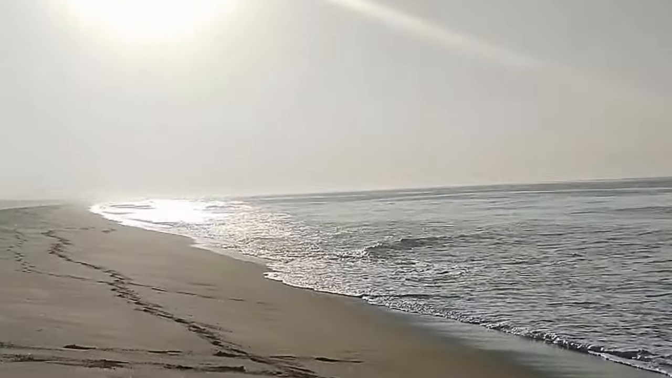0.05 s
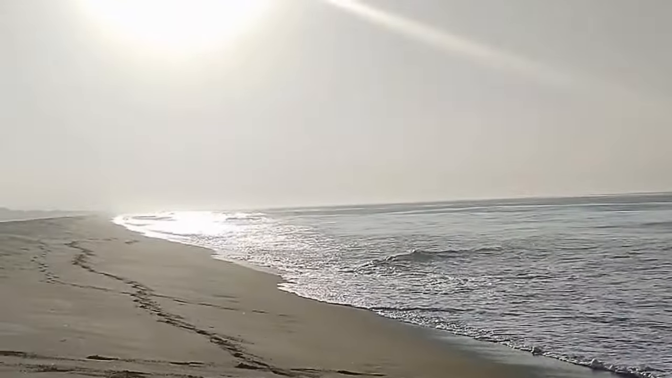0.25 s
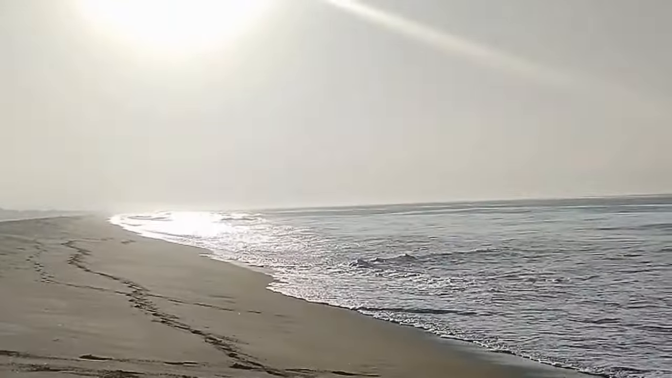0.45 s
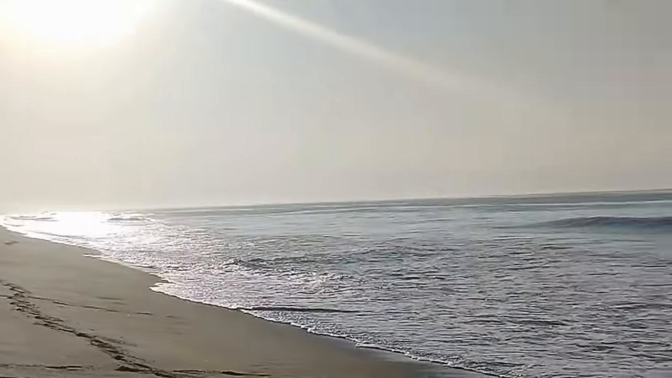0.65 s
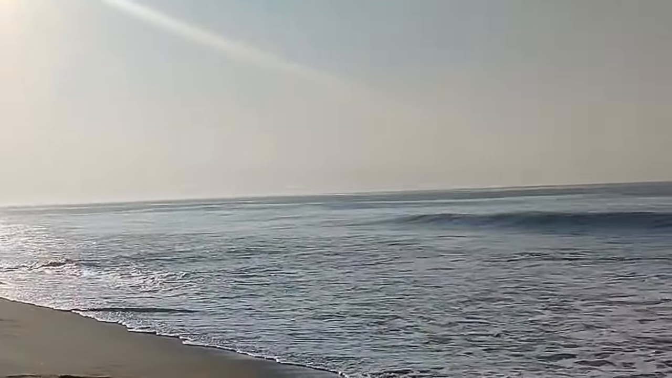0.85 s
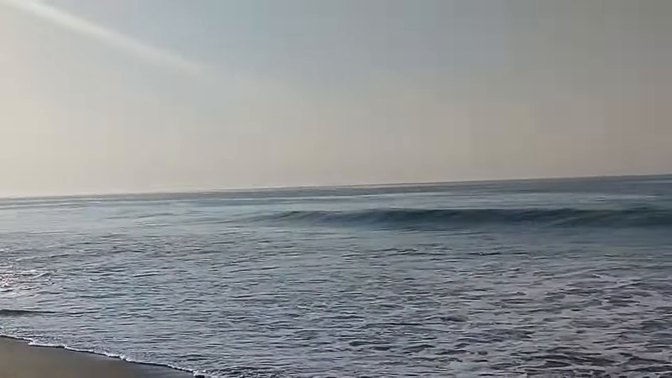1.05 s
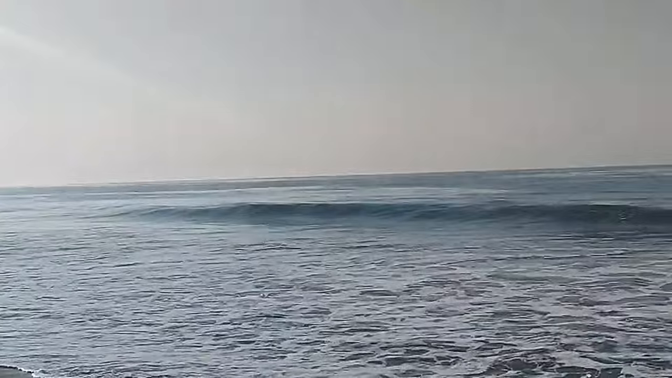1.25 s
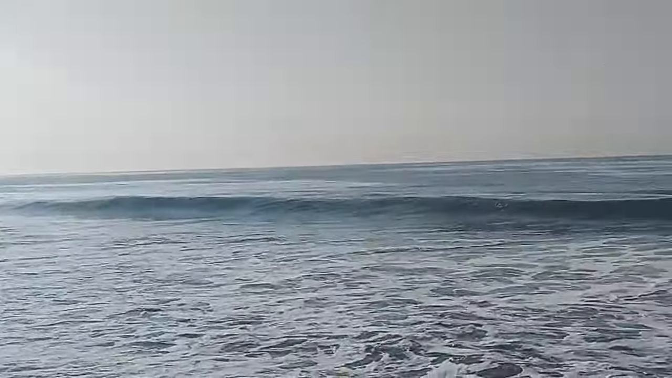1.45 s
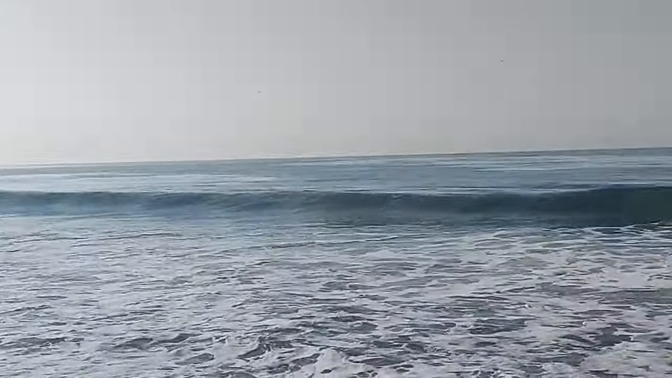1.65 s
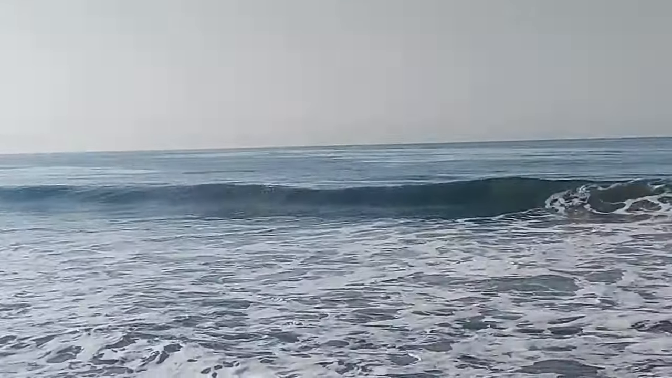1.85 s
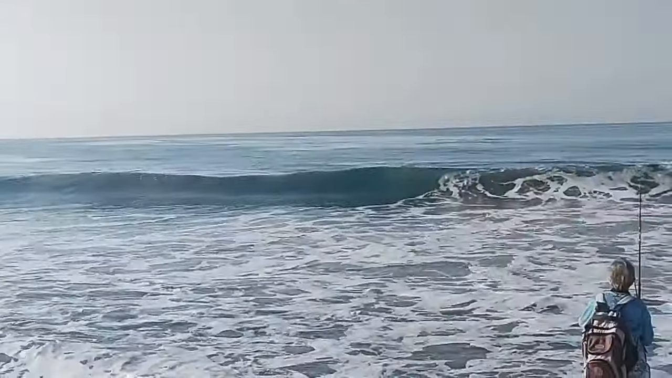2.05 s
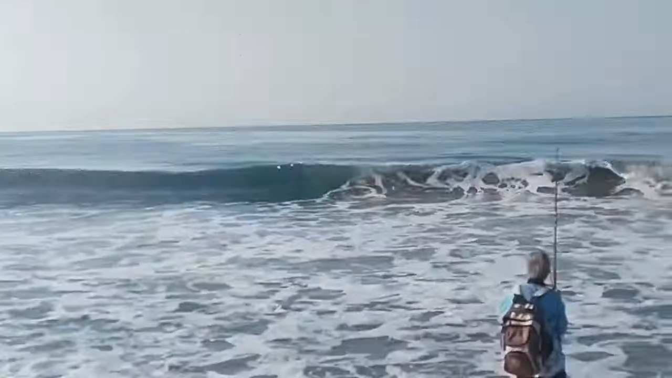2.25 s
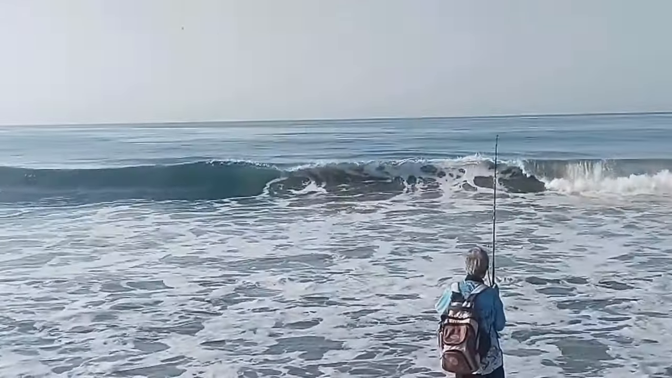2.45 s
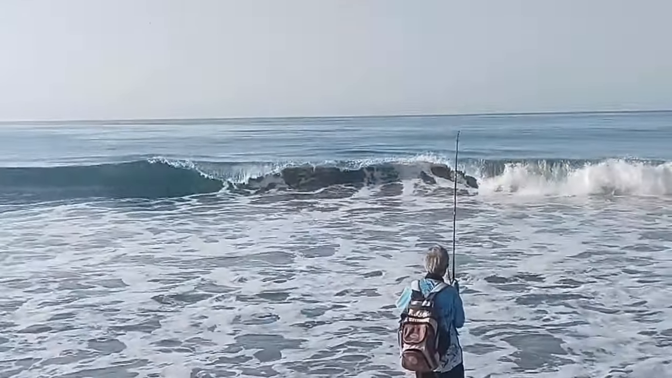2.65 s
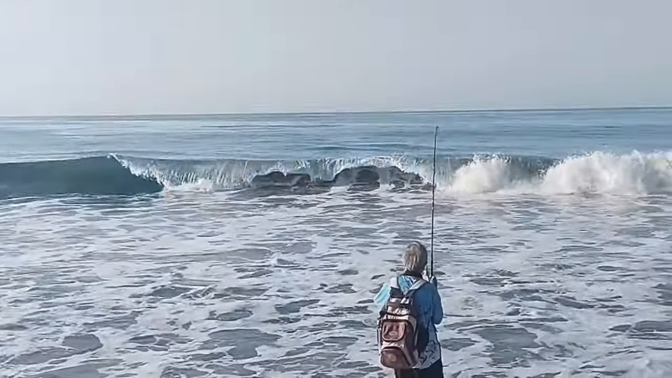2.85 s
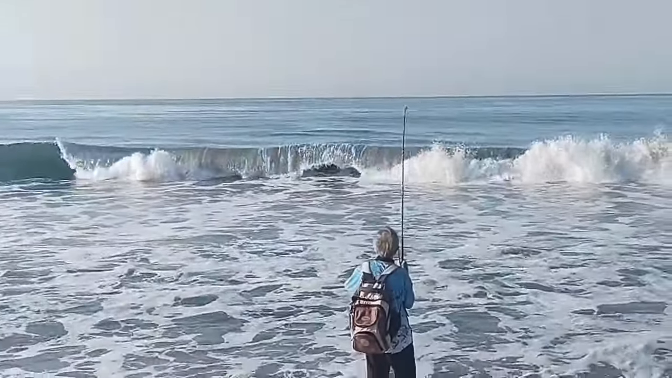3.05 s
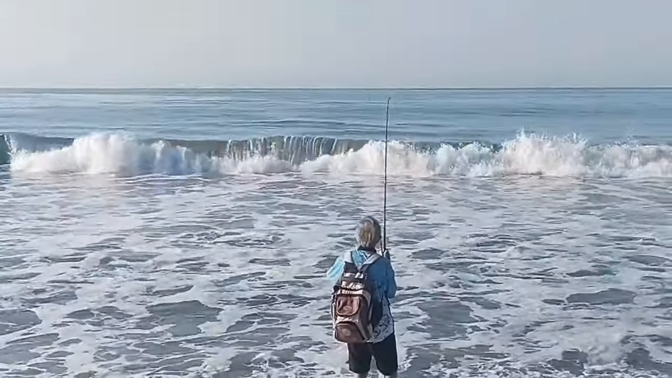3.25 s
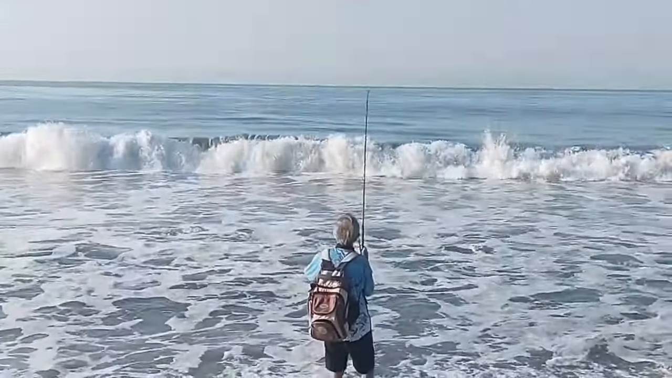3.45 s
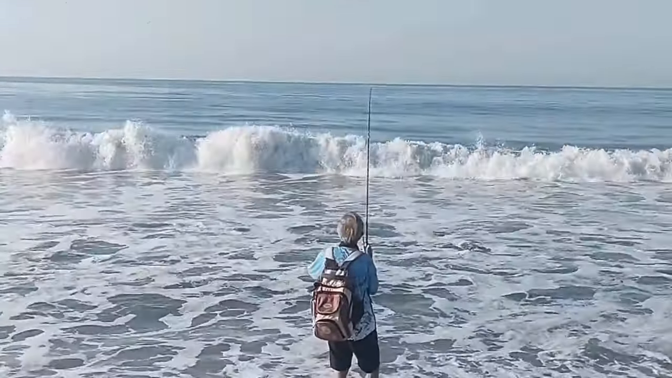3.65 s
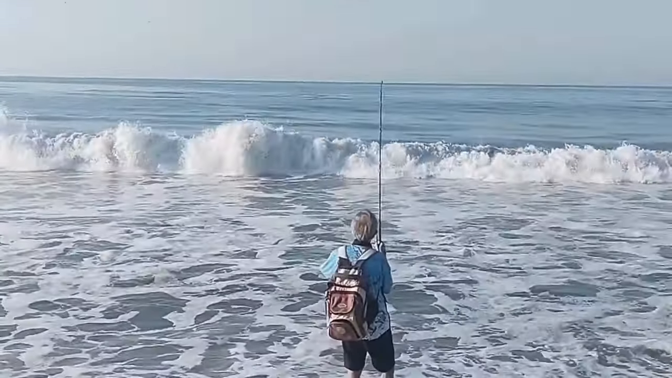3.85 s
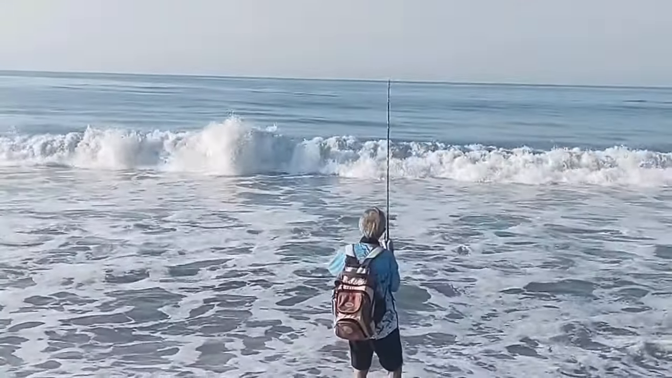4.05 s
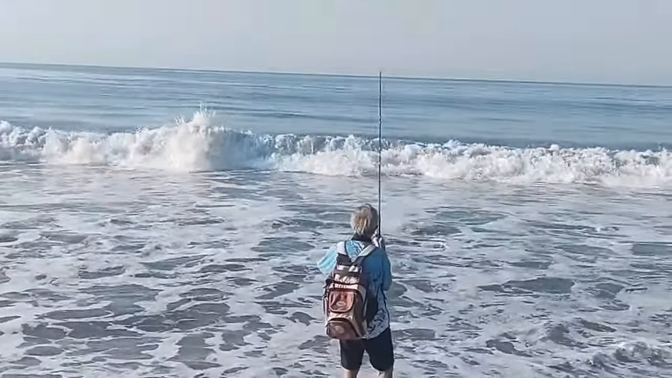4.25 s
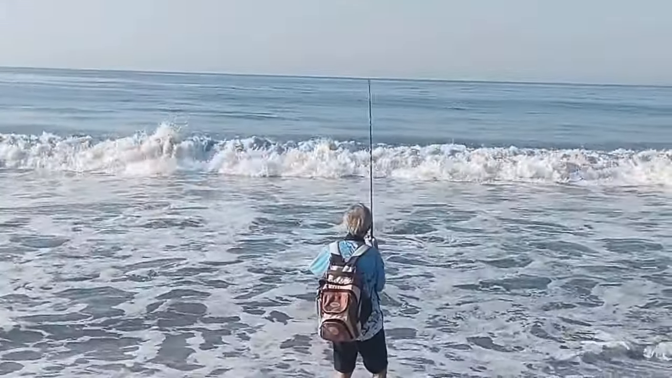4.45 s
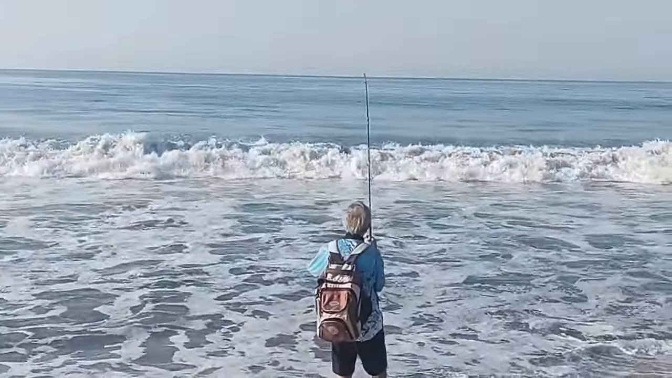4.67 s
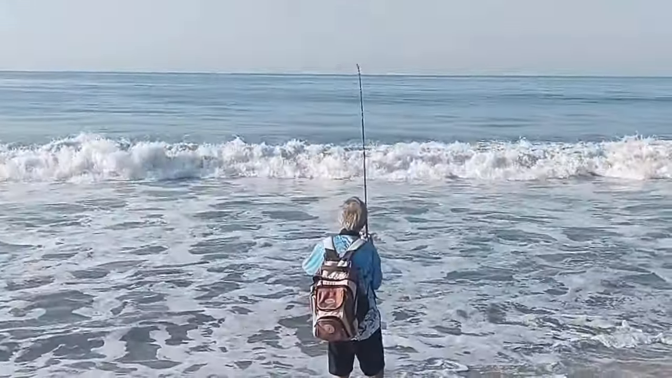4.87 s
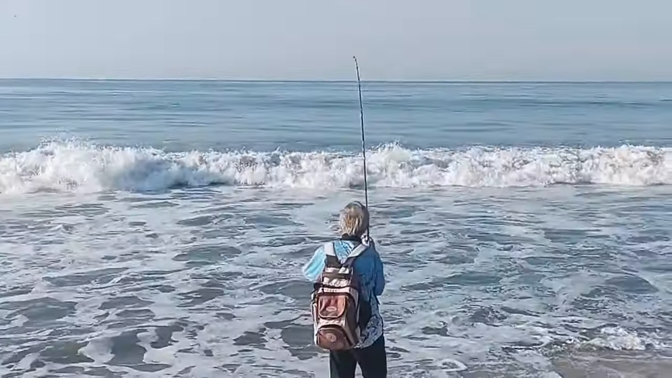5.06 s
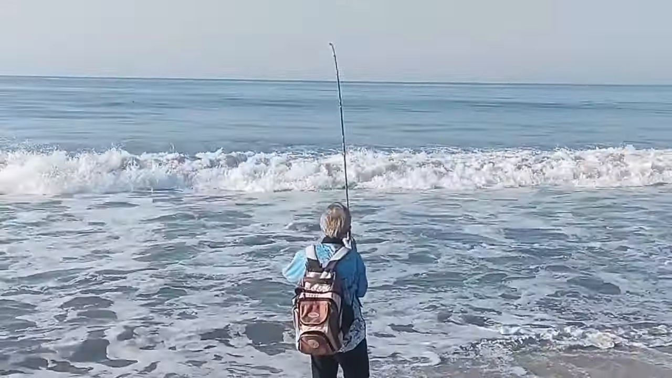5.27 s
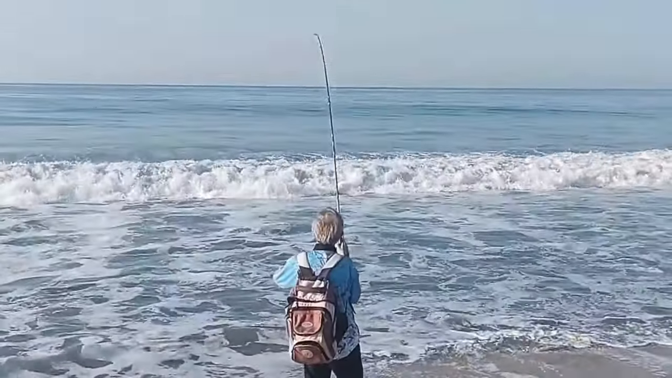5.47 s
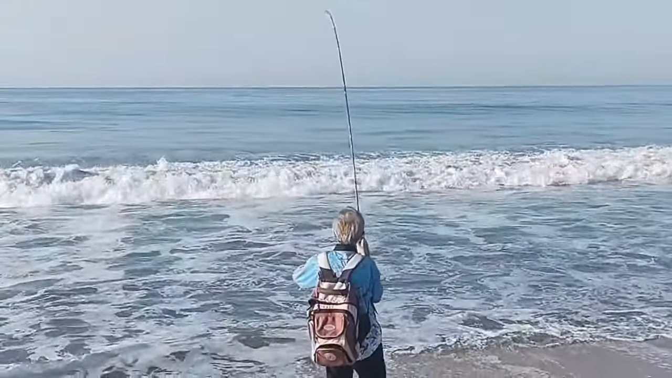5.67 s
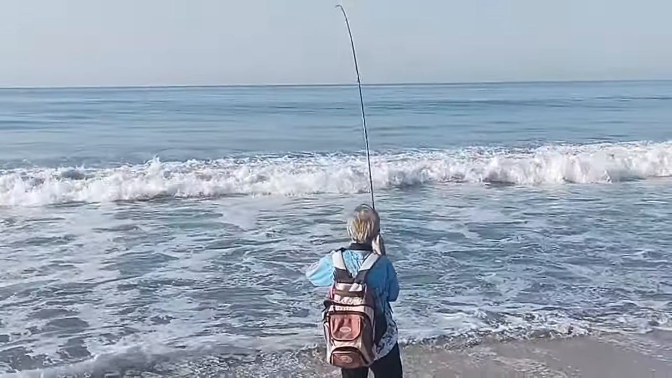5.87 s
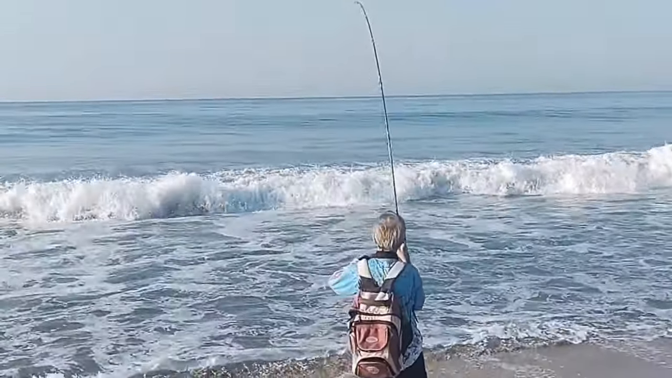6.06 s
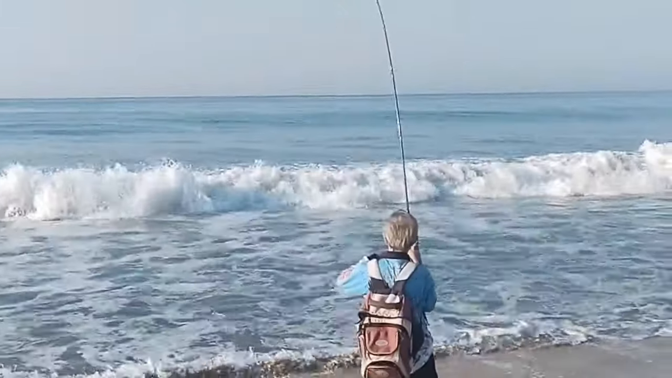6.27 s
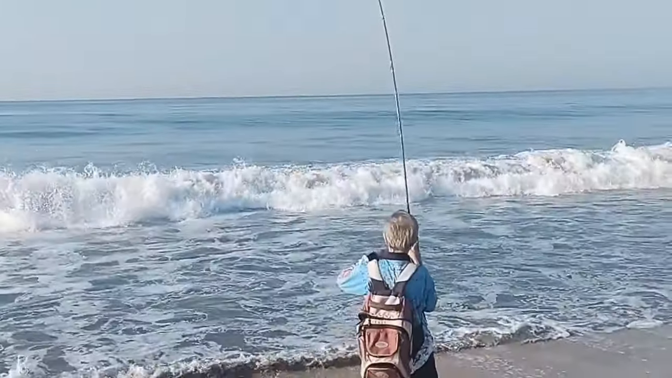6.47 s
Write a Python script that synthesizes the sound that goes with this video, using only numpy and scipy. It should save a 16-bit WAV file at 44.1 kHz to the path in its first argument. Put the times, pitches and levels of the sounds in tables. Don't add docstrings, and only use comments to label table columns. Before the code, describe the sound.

Quiet distant surf, then a small wave spills and a big one plunges with a deep thump, foam roaring on as wind buffets the microphone.

```python
import sys
import numpy as np
from scipy import signal
from scipy.fft import rfft, irfft, next_fast_len
from scipy.io import wavfile
from scipy.ndimage import uniform_filter1d, map_coordinates

SR = 44100
rng = np.random.default_rng(int(sys.argv[2]) if len(sys.argv) > 2 else 0)


def attenuation_scalar(level_db):
    decades = np.asarray(level_db, float) / 20
    return 10 ** decades


def put_to_file(sound):
    columns = np.atleast_2d(sound).T
    safe = np.clip(columns, -1, 1)
    whole_steps = np.round(safe * 32767)
    wavfile.write(sys.argv[1], SR, whole_steps.astype(np.int16))


N = 287091
FRAME = 1024

# start_s, end_s
STAGES = [
    (-1, 1.35),
    (1.35, 2.358),
    (2.358, 3.0),
    (3.0, 3.97),
    (3.97, 4.68),
    (4.5, 8),
]


def unit(x):
    return x / np.sqrt(np.mean(x ** 2) + 1e-20)


def along(points, hz):
    f, v = np.transpose(points)
    return np.interp(np.log(hz + 1), np.log(f + 1), v)


def curves(rows, t):
    s, *cols = np.transpose(rows)
    return [np.interp(t, s, c) for c in cols]


def wobble(rate_hz):
    knots = rng.standard_normal(int(N * rate_hz / SR) + 4)
    return map_coordinates(knots, [np.arange(N) * rate_hz / SR])


def filtered(x, response):
    m = next_fast_len(N + SR // 2)
    return irfft(rfft(x, m) * response(np.fft.rfftfreq(m, 1 / SR)), m)[..., :N]


def surf():
    noise = noise_cells()
    cells = sum(breaker(stage, noise, patchy_db=0.66) for stage in range(len(STAGES)))
    return signal.istft(cells, SR, nperseg=FRAME, noverlap=3 * FRAME // 4)[1][:, :N]


def noise_cells():
    return signal.stft(rng.standard_normal((2, N)), SR, nperseg=FRAME, noverlap=3 * FRAME // 4)


def breaker(stage, noise, patchy_db):
    hz, t, cells = noise
    window = stage_window(stage, t)
    on = window > 0
    t, window = t[on], window[on]
    shared, own = np.roll(cells, shift=stage * len(STAGES) ** 2, axis=2)[..., on]
    left_db, right_db, alike, lead = stage_colour(stage, hz)
    both = attenuation_scalar(2 * left_db) + attenuation_scalar(2 * right_db)
    both = (both + 2 * attenuation_scalar(left_db + right_db) * alike * np.cos(lead)) / 4
    level_db, rush, fizz = stage_level(stage, hz, both)

    gain = attenuation_scalar(level_db[:, None] + surges(hz, t, lip_lands=stage == 2))
    gain = gain * water_echo(hz, t) * np.sqrt(window)
    gain = gain * attenuation_scalar(patchy_db * (1 + fizz[:, None]) * splashes(gain.shape))
    sway = phone_sway(t, window, rush)
    turn = np.arccos(alike)[:, None] / 2
    left = np.cos(turn) * shared + np.sin(turn) * own
    right = np.cos(turn) * shared - np.sin(turn) * own
    out = np.zeros_like(cells)
    out[0][:, on] = gain * sway * left * (attenuation_scalar(left_db) * np.exp(-.5j * lead))[:, None]
    out[1][:, on] = gain / sway * right * (attenuation_scalar(right_db) * np.exp(.5j * lead))[:, None]
    return out


def stage_window(stage, t):
    fades_s = [.1, .65, .08, .3, .22, .16, .1]
    (start_s, end_s), (rise_s, fall_s) = STAGES[stage], fades_s[stage:stage + 2]
    rising = np.clip((t - start_s) / rise_s + .5, 0, 1)
    falling = np.clip((end_s - t) / fall_s + .5, 0, 1)
    return np.sin(np.pi / 2 * rising * falling) ** 2


def stage_colour(stage, hz):
    # hz, left_db_per_hz, right_db_per_hz, likeness_0_1
    far = [(65, 1, 1, 0.96), (201, -2.5, -1.5, 1), (400, -3.5, -3, 0.97), (650, -12, -14, 0.76),
           (930, -21.5, -22, 0.24), (1300, -17.5, -21, 0.3), (1750, -14.5, -21.5, 0.4),
           (2000, -15.5, -25, 0.3), (2300, -16, -26, 0.1), (2500, -18, -25, 0.1), (3300, -30.5, -32, 0.07),
           (4300, -33.5, -33.5, 0.33), (5160, -32, -38, 0.2), (7000, -42, -47, 0.4), (12500, -48, -52, 0.3),
           (15500, -49, -51, 0.3)]
    spill = [(65, -2, -3, 0.96), (200, -1.5, -1, 1), (396, -1.5, -0.5, 0.73), (690, -1, -1, 0.87),
             (1200, -6, -5.5, 0.62), (1740, 0, -10, 0.73), (2380, -5.5, -17, 0.44),
             (2800, -12.5, -20, 0.37), (3200, -24, -25, 0.2), (4500, -28.5, -30.5, 0.24),
             (6300, -28.5, -42, 0.3), (9000, -38, -49, 0.3), (12500, -44, -42, 0.3), (15500, -47, -45, 0.3)]
    plunge = [(65, -3.5, -6, 0.71), (200, 0.5, 1, 1), (332, -7, -6.5, 0.89), (600, -6, -6, 0.91),
              (990, -14, -14, 0.66), (1500, -19.5, -21, 0.2), (2100, -18, -28.5, 0.15),
              (2680, -20.5, -26, 0.16), (3600, -30.5, -30, 0.27), (4640, -38, -41, 0.25),
              (6000, -36, -43, 0.3), (9000, -46.5, -47, 0.3), (12500, -58, -58, 0.3),
              (15500, -61, -61, 0.3)]
    roll = [(65, -5.5, -4.5, 1), (203, 0, -0.5, 0.99), (318, -6.5, -6, 0.8), (600, -5, -6, .8),
            (930, -13.5, -14.5, 0.5), (1260, -14.5, -19, 0.3), (1600, -18, -24, 0.2),
            (2100, -18.5, -28.5, 0.4), (2670, -21, -27.5, 0.23), (3620, -29.5, -28.5, 0.34),
            (4560, -35, -38, .2), (6000, -36, -39.5, .3), (9000, -47, -46, 0.4), (12500, -58, -54, .3),
            (15500, -56, -58, .3)]
    burst = [(65, -3.5, -6, 0.91), (110, 2.5, 0, 1), (218, -1.5, -3, 0.98), (330, -7, -4.5, 0.51),
             (550, -4.5, -5, 0.73), (776, -11.5, -14, 0.14), (1270, -8.5, -12.5, 0.63),
             (2100, -9.5, -21, 0.58), (2800, -17.5, -23, 0.47), (4270, -30, -29, 0.32),
             (6300, -32.5, -36, 0.3), (9000, -42, -40.5, 0.33), (12500, -55, -46, 0.3),
             (15500, -54, -54, 0.3)]
    foam = [(65, -5.5, -3.5, 0.9), (213, -0.5, -2, 0.98), (320, -4, -3, 0.7), (540, -3.5, -5, 0.68),
            (746, -11.5, -13, 0.22), (1380, -9, -14, 0.65), (1890, -14.5, -24, 0.18),
            (2200, -16, -25, 0.46), (2600, -18, -26, 0.36), (3050, -23.5, -27, 0.31),
            (3710, -31.5, -31, 0.42), (4180, -40, -40.5, 0.33), (4560, -35, -39, 0.36),
            (5150, -37, -39.5, 0.22), (6500, -36.5, -38.5, 0.27), (12500, -55, -47.5, 0.32),
            (15500, -55, -54, 0.3)]
    # hz, lead_rad
    leads = [
        [(0, 0), (950, -2), (1250, -3), (1700, -6), (2100, -5), (3500, -6), (4800, -9.4), (6200, -13)],
        [(0, 0.27), (600, -0.5), (1250, -1), (1700, -0.97), (2100, 0.21), (2600, .4), (3100, 1.5), (6200, 1.1)],
        [(0, 0), (650, -0.45), (950, -0.44), (1250, -1.6), (1700, -1.3), (2100, -0.33), (6200, 0.65)],
        [(0, 0), (950, 0), (1250, 3), (2600, 10.5), (3150, 11.7), (4200, 14), (6200, 20)],
        [(0, 0), (700, .5), (1200, 3), (2700, 9.5), (4500, 15), (6200, 22), (6700, 25)],
    ]
    bearings = [0, 1, 2, 3, 4, 4]
    points = (far, spill, plunge, roll, burst, foam)[stage]
    log_points = [(np.log(f + 1), *rest) for f, *rest in points]
    left_db, right_db, alike = curves(log_points, np.log(hz + 1))
    lead, = curves(leads[bearings[stage]], hz)
    return left_db, right_db, np.clip(alike, 0, 1), lead


def stage_level(stage, hz, both):
    # low_hz, high_hz
    bands = [(50, 330), (330, 1200), (1200, 2800), (4500, 12000)]
    # boom_db, roar_db, rush_db, fizz_db
    beds = [(-50, -53.5, -64, -78.5), (-46.5, -47, -54, -74.5), (-31.5, -34, -48.5, -63),
            (-30.5, -35.5, -47.5, -62.5), (-29.5, -32.5, -41.5, -58.5), (-29.6, -34.5, -41, -63.5)]
    share_db = [10 * np.log10(np.sum(both[(hz >= lo) & (hz < hi)]) / len(hz)) for lo, hi in bands]
    centres_hz = [np.sqrt(lo * hi) for lo, hi in bands]
    blend = np.array([along(list(zip(centres_hz, row)), hz) for row in np.eye(len(bands))])
    return blend.T @ np.subtract(beds[stage], share_db), blend[2], blend[3]


def surges(hz, t, lip_lands):
    # crest_s, rise_s, fall_s, lift_db, pitch_hz
    collapses = [(0, .1, 0.25, 2.5, 2200), (1.42, 0.24, 0.23, 3, 2800), (1.71, 0.25, 0.96, 9.5, 2100),
                 (1.98, 0.27, .75, 5, 480), (1.95, .4, 0.35, 5.5, 6500), (2.2, .1, 0.13, -1.5, 1500),
                 (4.72, 0.2, 0.086, -0.5, 3000), (2.5, .25, 0.32, 2, 750), (2.6, .2, 0.15, 4.5, 3200),
                 (3.15, .3, 0.34, 3, 920), (3.2, .35, .15, 2, 5000), (3.3, 0.11, 0.13, 6.5, 9000),
                 (3.46, 0.29, 0.29, 4, 2200), (3.48, .2, 0.26, 5, 100), (3.85, 0.085, .15, 3.5, 1800),
                 (4.14, 0.2, 0.19, 6, 6000), (4.375, 0.25, .2, 8.5, 6000), (4.59, 0.21, 0.23, 4, 7000),
                 (5.2, 1, 1.1, 6.5, 13000), (5.27, 0.16, 0.15, 4.5, 16100), (6.55, 0.55, .1, 3, 2500)]
    # crest_s, rise_s,
    # fall_s,
    narrow_patches = [(0.026, .1, .3, 4.5, 1600), (.4, 0.76, .5, -6, 830), (.95, 0.33, 0.36, -4.5, 4000),
                      (1.3, 0.6, 0.22, 1.5, 1700), (1.44, .12, 0.12, 2.5, 1400), (1.5, 0.45, 0.29, 0, 450),
                      (1.31, .15, .15, -5, 870), (3.7, .2, 0.24, 0, 59), (4.8, 0.21, 0.11, 3.5, 405),
                      (1.62, .05, .15, 6, 1600), (2.01, 0.37, 0.27, 1.5, 1560), (2.38, 0.12, 0.14, -7, 4500),
                      (2.2, .1, 0.2, 7, 6900), (4.1, .3, 0.32, 1, 7400), (4.7, 0.097, 0.24, 5, 8300),
                      (1.69, 0.19, 0.22, -3, 4000), (1.92, 0.19, .3, 3, 560), (2.1, .2, 0.2, 1.5, 2600),
                      (2.3, 0.22, .08, 5, 320), (2.4, 0.055, 0.34, 0, 540), (2.5, 0.17, .2, -5, 300),
                      (2.85, .3, 0.19, -8, 74), (3.1, .08, .08, -3, 82), (2.83, 0.18, 0.23, -3.5, 3500),
                      (2.9, .15, 0.17, -2.5, 780), (3.31, 0.45, 0.24, 4.5, 1050), (3.56, 0.29, 0.26, 4, 2000),
                      (3.74, .3, 0.23, 4, 1250), (3.1, 0.21, 0.21, -2, 860), (3.92, 0.18, 0.36, 5, 2860),
                      (3.65, 0.19, .15, -2, 1700), (1.86, 0.12, .1, 3, 1000),
                      (3.2, 0.47, 0.054, 3, 2450), (4.15, .12, 0.078, 1.5, 230), (5.5, 0.18, 0.22, 5.5, 180),
                      (4.85, 0.16, 0.62, 4, 4100), (6.9, 0.12, .15, -3, 280), (5.5, .3, .25, -2, 286),
                      (7.7, 0.43, 0.19, -2, 150), (6.6, 0.1, 0.14, 5.5, 156), (5.97, 0.61, .6, -5, 3800),
                      (6.3, 0.24, 0.31, 2, 1400), (6.4, 0.21, 0.088, 5, 160), (3.86, .15, 0.1, 4.5, 2200),
                      (5.9, .35, 0.23, 3, 4100), (5.5, 0.24, .3, 1, 4100), (4.55, 0.14, 0.12, -4, 70),
                      (3, 0.18, 0.13, 4.5, 310), (1.78, 0.091, .15, 2, 2200), (2.4, .1, 0.092, 4.5, 2400),
                      (2.97, 0.088, 0.086, 5, 1300), (3.63, 0.27, .15, 0.5, 7900),
                      (3.65, 0.23, .15, 0.5, 5400), (3.5, 0.28, 0.24, -1, 800), (2.21, .12, .1, -5, 7500),
                      (2.38, .1, .1, -3, 3100), (2.22, .12, .1, 3, 2700), (6.1, .8, .6, -2, 4200),
                      (4.9, .15, .15, 2, 190), (3.7, 0.23, .15, -8.5, 260), (5.95, 0.42, .15, 2.5, 350),
                      (1.55, .05, .05, 3, 340)]
    # build_up_s, held_back_db, pitch_hz
    late = [
        (0.36, -11.5, 180),
        (0.24, -4, 3700),
    ]
    lip_s, mist_hz = 2.316, 7500
    rows = [(*row, 1.344) for row in collapses]
    rows += [(*row, 0.22) for row in narrow_patches]
    if lip_lands:
        rows += [(lip_s, 1, *row, 0.83) for row in late]
    lift_db = 0
    for s, rise_s, fall_s, db, pitch_hz, octaves in rows:
        away = np.where(t < s, (s - t) / rise_s, (t - s) / fall_s)
        swell = np.cos(np.pi / 2 * np.clip(away, 0, 1)) ** 2
        off_pitch = np.log2(np.clip(hz, 1, mist_hz) / pitch_hz) / octaves
        lift_db = lift_db + db * np.outer(np.exp(-off_pitch ** 2 / 2), swell)
    return lift_db


def water_echo(hz, t):
    # time_s, delay_ms, strength_0_1, phase_rad, lowest_hz
    mirror = [(1.1, 1.8, 0.2, 1.7, 500), (1.55, 1.86, 0.4, 1.9, 500), (1.75, 1.93, 0.59, 1.9, 500),
              (2.05, 1.85, 0.53, 1.5, 500), (2.25, 1.94, .55, .7, 500), (2.45, 2, 0.47, .35, 500),
              (2.8, 1.9, 0.54, 0, 600), (3.2, 1.98, 0.75, 0.19, 900), (3.5, 1.93, 0.9, 0, 1500),
              (3.85, 2.12, .6, 0.093, 1550), (4.15, 1.84, 0.4, 0, 1600), (4.7, 2.3, .03, 1, 1600)]
    delay_ms, strength, phase, low_hz = curves(mirror, t)
    hz = hz[:, None]
    reach = 1 / (1 + (hz / 2900) ** 9) / (1 + (low_hz / (hz + 1)) ** 6)
    strength = strength * reach
    echo = strength * np.exp(1j * (phase - 2 * np.pi * hz * delay_ms / 1000))
    return np.abs(1 + echo) / np.sqrt(1 + strength ** 2)


def splashes(shape):
    field = uniform_filter1d(rng.standard_normal(shape), size=12, axis=0)
    return unit(uniform_filter1d(field, size=12, axis=1))


def phone_sway(t, window, rush):
    # time_s, left_minus_right_db
    aim = [(0.0, 6), (0.94, 4.5), (1.01, 7), (1.5, 6.0), (1.68, 8.5), (2.36, 2.5), (3.48, 5), (5.8, 8.5),
           (6.51, 8)]
    pan_db, = curves(aim, t)
    return attenuation_scalar(rush[:, None] * (pan_db - np.average(pan_db, weights=window)) / 2)


def thumps():
    # time_s, peak_db, pitch_hz, t60_s
    landings = [
        (2.516, -13.5, 190, 0.048),
        (2.534, -16.5, 81, 0.13),
        (2.358, -32, 550, .09),
        (0.44, -32, 140, 0.046),
        (.284, -56, 6400, .012),
        (.285, -63, 7100, .01),
        (1.552, -34, 173, 0.031),
        (1.4, -29, 640, 0.037),
    ]
    out, t = np.zeros(N + SR), np.arange(SR // 4) / SR
    for s, db, hz, t60_s in landings:
        envelope = attenuation_scalar(db + 4 - 60 * t / t60_s) * (1 - np.exp(-t / 0.0038))
        out[round(s * SR):][:len(t)] += envelope * np.sin(2 * np.pi * hz * t)
    return out[:N]


def wind():
    # time_s, peak_db, half_length_s
    gusts = [(0.545, -40.5, .14), (.75, -41, .1), (1.08, -43, 0.17), (1.95, -52, .25), (2.58, -38.5, 0.15),
             (3.03, -34, 0.15), (3.55, -44, .3), (3.875, -28, 0.058), (4.342, -27.5, .24),
             (4.754, -33, 0.11), (5.0, -33, 0.09), (5.258, -28, 0.12), (6.07, -27.5, 0.19),
             (6.394, -33.5, 0.11)]
    # hz, db_per_hz
    buffet = [(60, -0.5), (100, -0.5), (170, -3.5), (300, -11), (600, -24), (2000, -79)]
    lull_db = -53
    t = np.arange(N) / SR
    power = attenuation_scalar(2 * lull_db)
    for s, db, half_s in gusts:
        power = power + attenuation_scalar(2 * db) * np.exp(-1.4 * ((t - s) / half_s) ** 2)
    lumps = attenuation_scalar(0.99 * wobble(14) + 2.4 * np.array([wobble(25), wobble(25)]))
    rumble = filtered(rng.standard_normal((2, N)), lambda hz: attenuation_scalar(along(buffet, hz)))
    return np.sqrt(power) * unit(lumps * rumble) * attenuation_scalar([[1], [-10]])


def scene():
    return surf() + thumps() + wind()


def blocks(shape, size):
    draws = rng.random((shape[0] // size[0] + 1, shape[1] // size[1] + 1))
    return np.kron(draws, np.ones(size))[:shape[0], :shape[1]]


def thin_treble(x):
    # time_s, thinning_0_1, top_gap_chance_0_1, width_chance_near_12600_hz_0_1
    thinning_rows = [(1.3, 0, 0, 0), (1.6, 0.5, 0, .5), (1.8, 0.35, 0, 0.17), (2.3, 0.7, 0.16, 0),
                     (2.4, 0.97, .38, 0), (3.1, 0.9, .28, 0), (3.4, 0.94, .1, .5), (4.2, 0.98, .04, .75),
                     (5.5, 1, .03, .6), (6.5, 1, .12, 0.49)]
    # hz, chance_0_1
    gaps = [(3800, 0), (4400, .16), (5000, .03), (6200, .08), (7200, .48), (8600, .36), (9800, 0.14),
            (11000, .05), (15500, .07)]
    # hz, chance_0_1
    slits = [(3000, 0), (3500, .04), (4000, .07), (4500, .13), (5000, .04), (5600, .06), (6200, .01)]
    # hz, chance_0_1
    width_kept = [(5800, 0.99), (6800, 0.5), (7600, 0.4), (9000, 0.5), (10000, 0), (15500, .1)]
    lead_in = FRAME - 350
    frames = dict(fs=SR, window="cosine", nperseg=2 * FRAME, noverlap=FRAME)
    hz, t, (left, right) = signal.stft(np.pad(x, ((0, 0), (lead_in, 0))), **frames)
    thinning, top, wide = curves(thinning_rows, t)
    hz, shape = hz[:, None], left.shape

    whole = along(gaps, hz) * thinning * (hz > 6200)
    kept = blocks(shape, size=(16, 1)) > .45 * whole
    kept = kept * (blocks(shape, size=(32, 1)) > .3 * whole)
    kept = kept * (blocks(shape, size=(32, 2)) > .12 * whole)
    kept = kept * (blocks(shape, size=(5, 3)) > along(slits, hz))
    kept = kept * (blocks(shape, size=(7, 2)) > ((hz > 11300) & (hz < 15200)) * top)
    kept = kept * ((hz < 15200) | (blocks(t[None].shape, size=(1, 2)) > .4 * (t > 2.9)))
    width = along(width_kept, hz) + wide * np.exp(-((hz - 12600) / 700) ** 2)
    flicker_db = 11 * thinning * ((hz > 6000) & (hz < 9800)) * (blocks(shape, size=(40, 1)) - .5)
    mid = (left + right) / 2 * kept * attenuation_scalar(flicker_db)
    side = (left - right) / 2 * (blocks(shape, size=(16, 2)) < width) * np.where(hz > 6500, .78, 1)
    return signal.istft(np.array([mid + side, mid - side]), **frames)[1][:, lead_in:][:, :N]


def top_cut(x):
    return signal.sosfilt(signal.butter(12, 15840, fs=SR, output="sos"), x)


def record(dry):
    # hz, gain_db
    mic = [(25, -28), (45, -16.5), (65, -4), (100, 2), (200, 1.5), (330, -1), (1200, 0.54), (1600, -1.5),
           (2100, 1.5), (2600, 0), (5500, 0), (7500, 2.5), (10500, 0.9), (14500, 4)]
    heard = filtered(dry, lambda hz: attenuation_scalar(along(mic, hz)))
    return top_cut(thin_treble(heard))


dry = scene()
out = record(dry)
put_to_file(out)
```